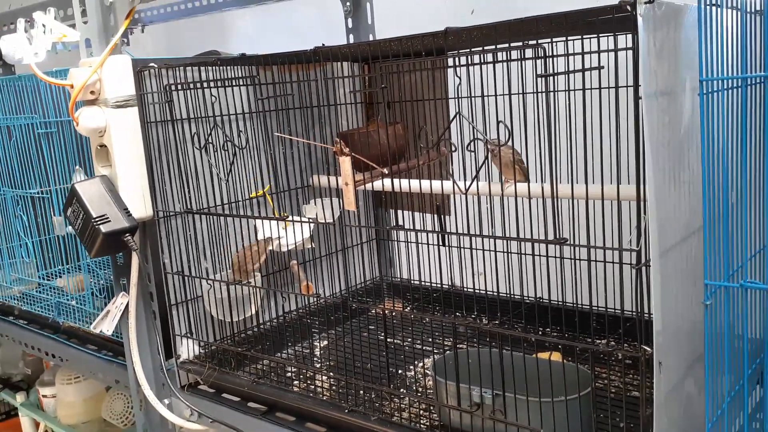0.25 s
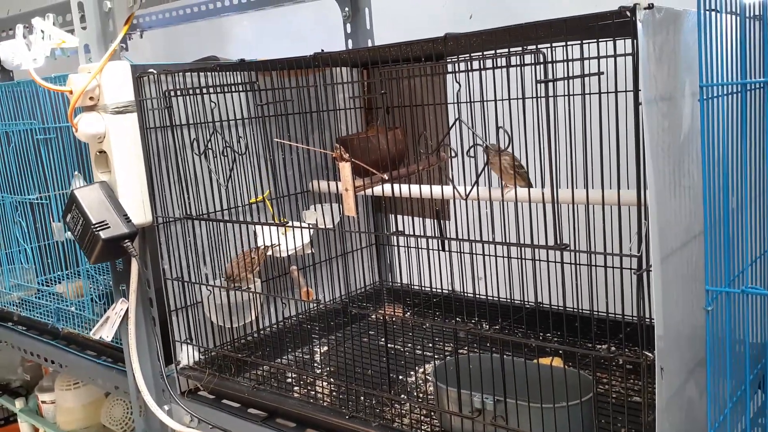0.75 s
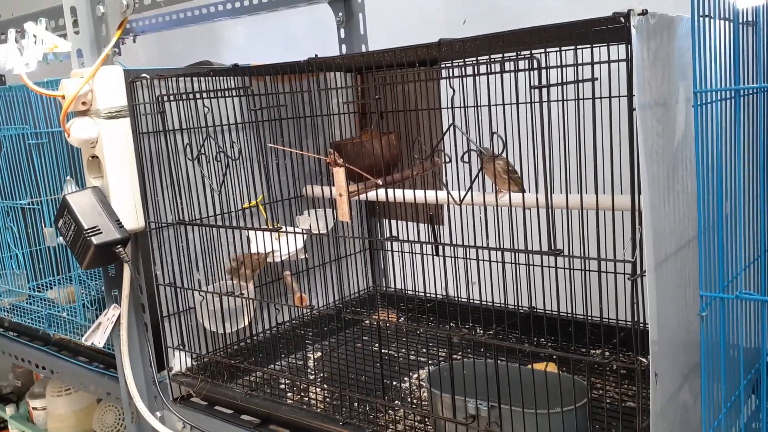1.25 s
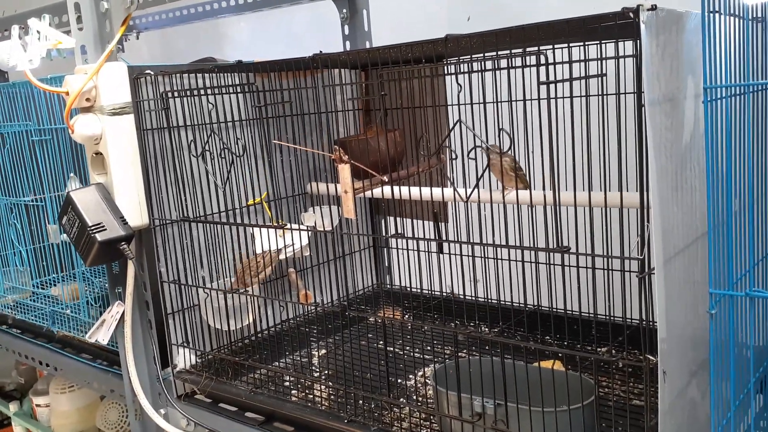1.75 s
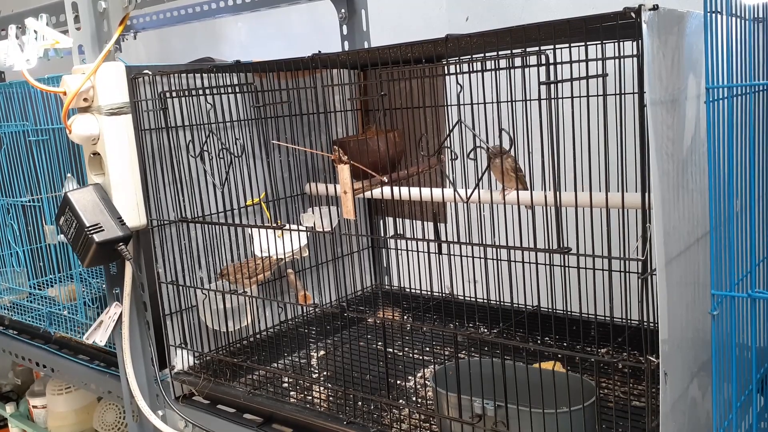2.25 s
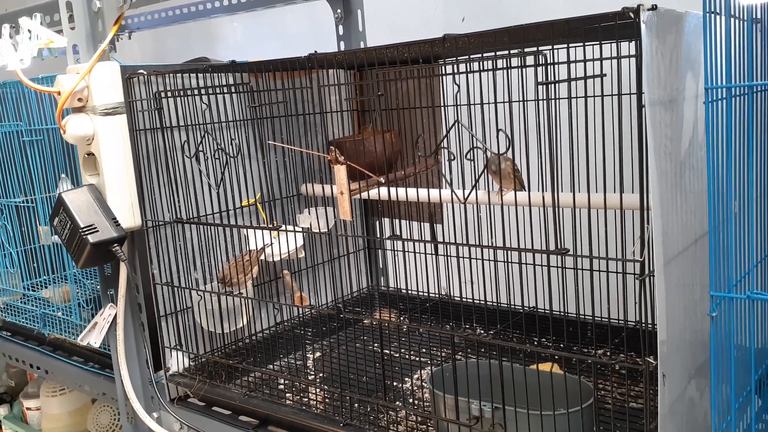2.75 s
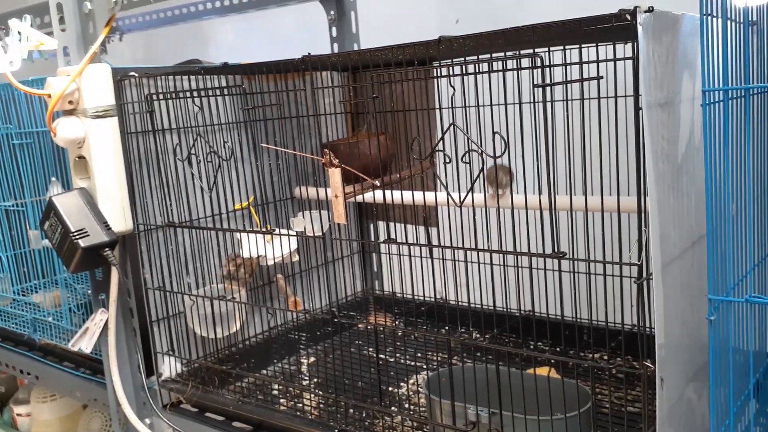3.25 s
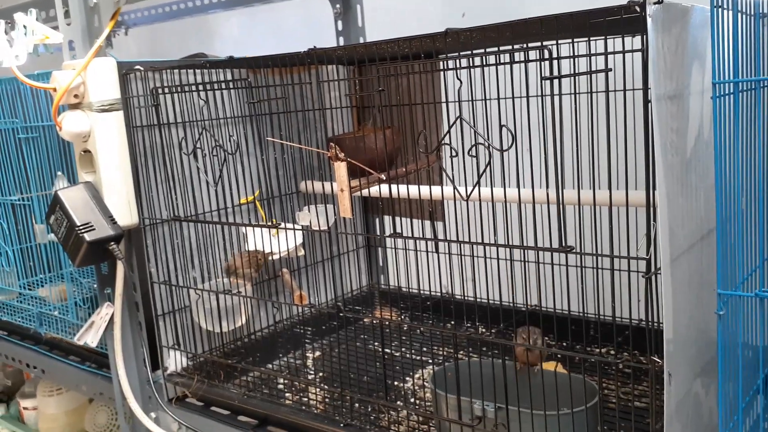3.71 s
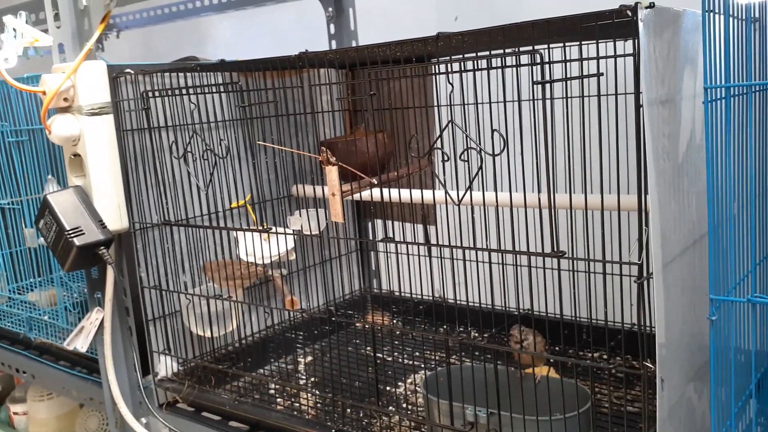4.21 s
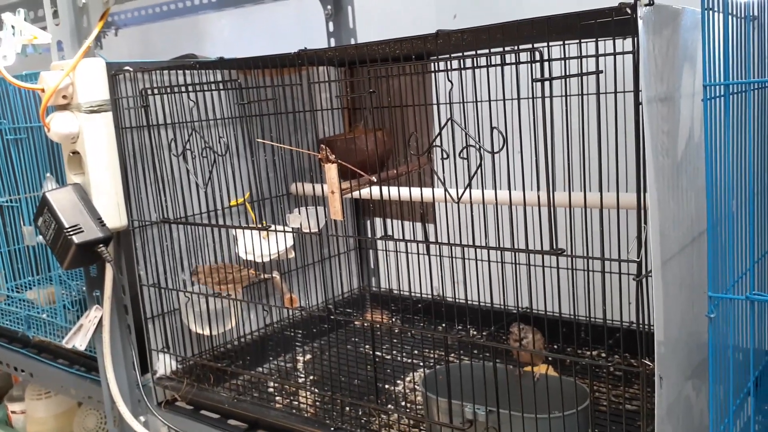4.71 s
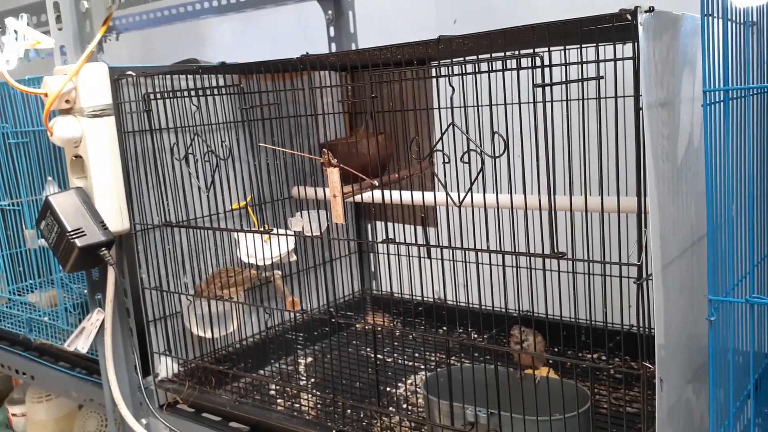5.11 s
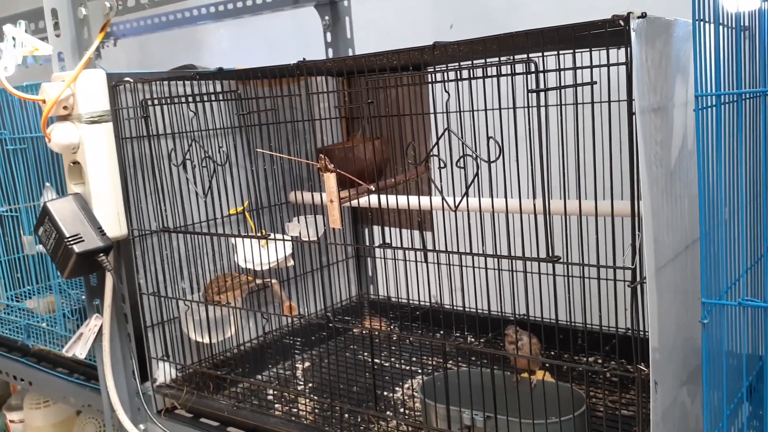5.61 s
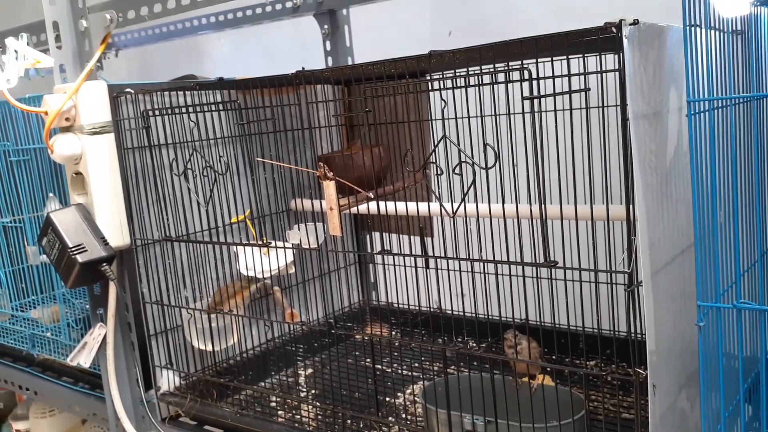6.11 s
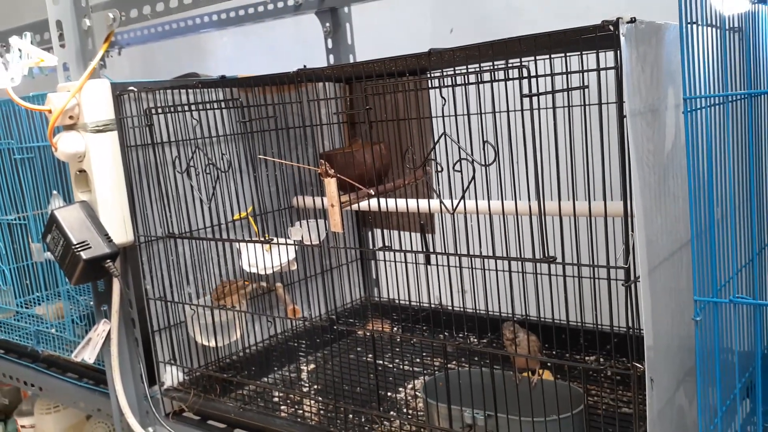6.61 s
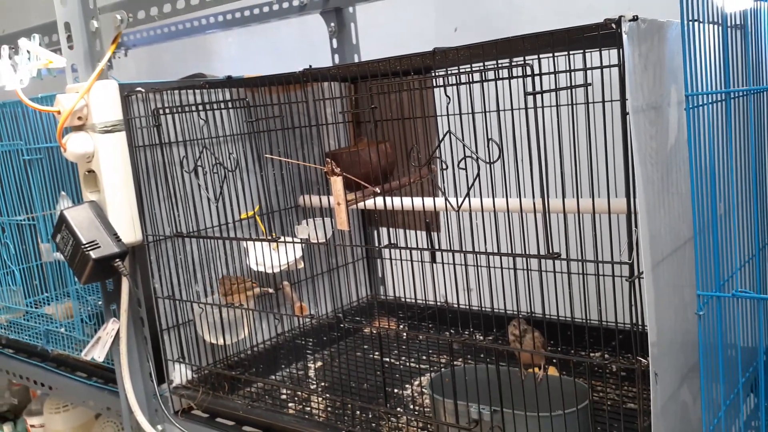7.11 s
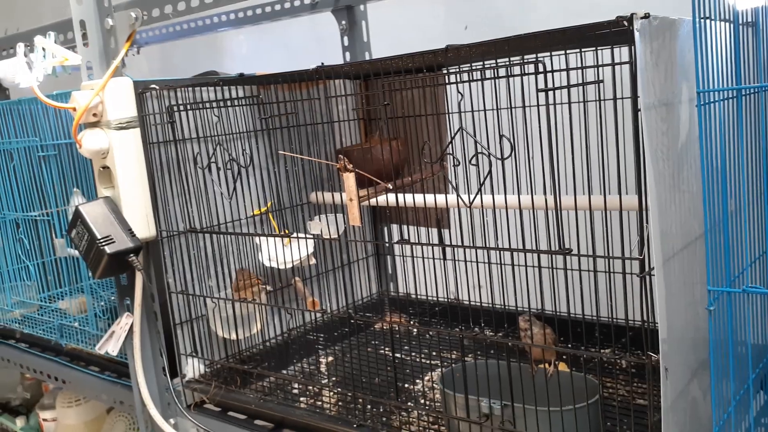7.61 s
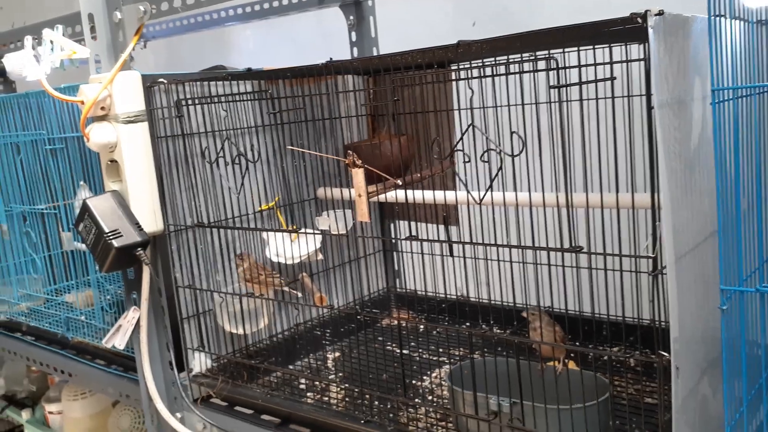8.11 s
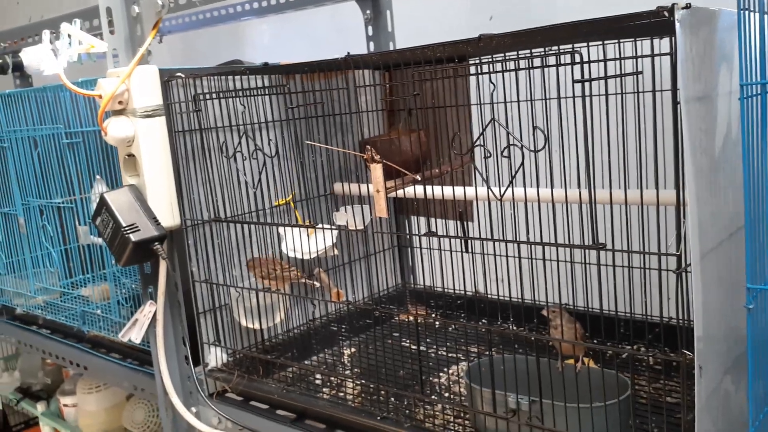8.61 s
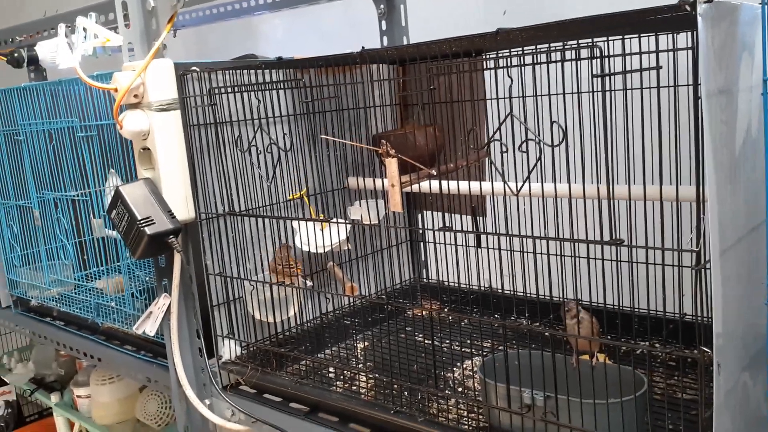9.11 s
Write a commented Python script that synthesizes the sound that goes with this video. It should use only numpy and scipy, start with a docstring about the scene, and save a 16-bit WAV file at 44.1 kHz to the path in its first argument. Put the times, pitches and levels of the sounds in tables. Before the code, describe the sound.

Caged finches sound off indoors, a few near the microphone and more in the distance. Brief high whistles stand out at first, then the calls thin to a faint rapid trill, with soft scrapes and claw taps on the cage wire. The twittering picks up again, ending with a loud falling cheep and a clear whistle. The room rings slightly, over a quiet wavering hum and thin hiss.

```python
"""A hard-walled room full of wire cages, with small finches calling.
Near birds give held whistles and falling cheeps, near-pure syrinx tones coloured by throat and beak.
One bird trills on and on; others twitter further off. Claws tick on the wire as birds land,
soft scrapes excite hollow rings, and a low hum wavers under the building's rumble and a thin hiss."""
import sys
import numpy as np
from scipy import signal
from scipy.fft import rfft, irfft, next_fast_len
from scipy.io import wavfile
from scipy.ndimage import map_coordinates

SR = 44100
rng = np.random.default_rng(int(sys.argv[2]) if len(sys.argv) > 2 else 0)


def generate_wav(sig):
    """Save sig (samples, or channels by samples) to the path in sys.argv[1] as 16-bit PCM at SR."""
    pcm = np.round(np.clip(np.atleast_2d(sig).T, -1, 1) * 32767).astype(np.int16)
    wavfile.write(sys.argv[1], SR, pcm)


N = 412335
T = np.arange(N) / SR

# held whistles: (time [s], length [s], start pitch [Hz], held pitch [Hz], slide [s], level [dB],
# overtone gain [dB], roughness [0-1])
WHISTLES = [ (0.468, 0.14, 4220, 4691, 0.029, -22, -20, 0.18),
            (0.77, 0.17, 3690, 3471, 0.07, -31.5, -28.5, 0.06),
            (2.346, 0.11, 2704, 3597, 0.03, -26.5, -24.5, 0.58),
            (3.222, 0.063, 3670, 3570, 0.021, -52, -29, 0.16),
            (3.348, 0.12, 3780, 3560, 0.016, -51.5, -27, 0.15),
            (3.651, 0.1354, 3570, 3455, .05, -26, -25.5, 0.07),
            (7.08, 0.145, 2680, 3648, 0.027, -35.5, -20, 0.9),
            (8.588, 0.13, 3693, 3486, 0.075, -24, -28.5, 0.11)]

def whistles(slide_db=15, sag_hz=1000, settle_s=0.04):
    """Each whistle slides softly onto its pitch and holds; rough ones slip below it until they settle."""
    out = np.zeros(N)
    for at_s, length_s, start_hz, held_hz, slide_s, db, overtones_db, rough in WHISTLES:
        t = np.arange(0, length_s, 1 / SR)
        sliding = np.maximum(1 - t / slide_s, 0)
        tremble = .005 * wander(t, 90)
        slips_hz = rough * sag_hz * np.tanh(wander(t, 260) ** 2 / 2) * np.exp(-t / settle_s)
        hz = held_hz * (1 + tremble) + (start_hz - held_hz) * sliding - slips_hz * (1 - sliding)
        onset_dip_db = slide_db * (1 - rough / 2) * np.sqrt(sliding)
        level = amp(db - onset_dip_db + 2.5 * rough * wander(t, 220))
        shape = swell(t, length_s, rise_s=.006, fall_s=.025)
        add(out, at_s, level * shape * syrinx(hz, overtones_db, drop_db=12.5))
    return out


# falling cheeps: (time [s], length [s], first pitch [Hz], middle pitch [Hz], last pitch [Hz],
# level [dB], overtone gain [dB])
CHEEPS = [ (0.34, 0.066, 4350, 3115, 2387, -37, -20), (1.336, 0.083, 4610, 3684, 2890, -51.5, -18),
          (2.165, 0.078, 3420, 2815, 2543, -36.5, -31.5), (2.192, 0.039, 5710, 5010, 3900, -45, -18),
          (2.75, 0.094, 4870, 3273, 2913, -42, -12), (5.661, 0.12, 4766, 3227, 2490, -38, -16.5),
          (7.557, 0.08, 3755, 3007, 2680, -37.5, -19), (8.097, 0.092, 4705, 3840, 3487, -18.5, -28.5),
          (8.208, 0.048, 3525, 2900, 2130, -32.5, -24)]

def cheeps(rise_s=0.015, fall_s=0.011, growth_db=1.5, flutter_db=4.3):
    """Each cheep drops fast, then levels out, growing louder and hoarser as it falls."""
    out = np.zeros(N)
    for at_s, length_s, first_hz, middle_hz, last_hz, db, overtones_db in CHEEPS:
        t = np.arange(0, length_s, 1 / SR)
        progress = t / length_s
        span_hz = first_hz - last_hz
        bend = -np.log2(np.clip((middle_hz - last_hz) / span_hz, .05, .9))  # middle pitch at half length
        strain = np.interp(db, [-36, -18], [1, .45])  # loud calls are purer
        hoarseness = strain * (.004 + .011 * progress) * wander(t, 900)
        hz = (last_hz + span_hz * (1 - progress) ** bend) * (1 + hoarseness)
        level = amp(db + growth_db * (progress - 1) + flutter_db * wander(t, 489))
        shape = swell(t, length_s, rise_s, fall_s)
        add(out, at_s, level * shape * syrinx(hz, overtones_db, harmonics=5))
    return out


# throat and beak response on the overtones: (frequency [Hz], gain [dB])
THROAT_RESPONSE = [(4500, 23), (5400, 9.5), (6400, -4.5), (7200, -17), (8200, 6), (9500, 1), (11000, 3.5),
                   (12500, 3), (14200, 2.5), (15500, -10.5)]

def syrinx(hz, overtones_db, harmonics=4, drop_db=8):
    """Near-pure tone; throat and beak shape the overtones, with an extra drop above the third harmonic."""
    phase = 2 * np.pi * np.cumsum(hz) / SR
    overtones = np.zeros_like(phase)
    for k in range(2, harmonics + 1):
        gain = amp(read(THROAT_RESPONSE, k * hz) - drop_db * (k > 3))
        overtones += gain * (k * hz < SR / 2) * np.sin(k * phase)
    return np.sqrt(2) * (np.sin(phase) + amp(overtones_db) * overtones)


# surges of the trill: (time [s], length [s], level [dB])
TRILL_SURGES = [(1.5, 0.82, -49.5), (3.7, 0.46, -52), (5.72, .72, -52.5), (7.75, 0.6, -50)]

def trill(rest_db=-60, rest_hz=5304, steady_from_s=3.75, syllables_per_s=16.6,
          push_hz_per_db=19.5, widen_hz_per_db=13):
    """Run of tiny, uneven falling syllables; pushing harder raises the pitch and widens each sweep."""
    surges = bouts(TRILL_SURGES, rise_s=.3, fall_s=.13)
    level = np.maximum(amp(rest_db) * (T > steady_from_s), surges)
    effort_db = 20 * np.log10(np.maximum(level / amp(rest_db), 1))
    rate_hz = syllables_per_s * (1 + .08 * wander(T, 12))
    cycle = (np.cumsum(rate_hz) / SR) % 1
    depth_hz = 115 + widen_hz_per_db * effort_db
    sweep_hz = depth_hz * (np.cos(np.pi * cycle) - 0.43 + 0.37 * wander(T, 700))
    gate = ramp(cycle / .2) * ramp((.85 - cycle) / .3)
    syllables = unit(gate * amp(2 * wander(T, 20)))
    pitch_hz = rest_hz + push_hz_per_db * effort_db + 30 * wander(T, 15)
    return level * syllables * syrinx(pitch_hz + sweep_hz, overtones_db=-19.5, harmonics=2)


# clearer calls from far cages: (time [s], length [s], first pitch [Hz], last pitch [Hz], level [dB])
FAR_CALLS = [ (-.06, 0.073, 6470, 4800, -40), (0.103, 0.062, 2874, 2744, -60.5),
             (0.163, 0.14, 4910, 3720, -50), (0.646, .04, 2814, 3430, -42),
             (0.635, 0.17, 6000, 5030, -50.5), (0.828, 0.11, 3260, 2920, -55.5),
             (1.011, 0.18, 2350, 2177, -69), (1.908, 0.045, 2057, 2680, -51),
             (2.39, 0.13, 5475, 5170, -47.5), (2.833, 0.14, 2800, 1880, -51.5),
             (2.929, 0.047, 4154, 3490, -44.5), (3.208, 0.22, 4234, 4120, -59.5),
             (3.498, 0.044, 2525, 2980, -50.5), (5.478, 0.23, 4340, 7000, -55),
             (5.862, 0.15, 6780, 6920, -54), (5.938, 0.27, 4110, 3160, -56),
             (6.152, 0.094, 3310, 3380, -47.5), (6.187, 0.094, 3100, 1944, -52.5),
             (6.268, 0.12, 5000, 4520, -48.5), (6.352, 0.18, 7550, 5170, -53.5),
             (6.48, 0.11, 5200, 4630, -46), (6.605, .1, 3626, 3262, -52), (6.753, 0.17, 5970, 4806, -50),
             (6.855, 0.19, 2113, 2754, -62), (7.174, 0.17, 5475, 4250, -46), (7.365, 0.12, 3094, 3820, -48),
             (7.442, 0.17, 7240, 6600, -55), (7.661, .07, 4590, 3680, -43), (8.329, 0.09, 5440, 4750, -44),
             (8.451, 0.043, 2590, 2270, -42.5), (8.631, 0.14, 4990, 4430, -45.5),
             (8.736, .13, 2666, 2480, -59), (8.812, .085, 7460, 6560, -56.5),
             (8.965, 0.44, 3770, 3410, -54.5), (9.019, 0.11, 3185, 2162, -52),
             (9.217, 0.063, 6480, 5620, -51.5)]

def twitter(min_rasp=0.092, rasp_per_octave=1.9, max_rasp=.55):
    """Single far calls; the steeper the glide, the more it buzzes."""
    out = np.zeros(N)
    for at_s, length_s, first_hz, last_hz, db in FAR_CALLS:
        octaves = abs(np.log2(first_hz / last_hz))
        rasp = min(min_rasp + rasp_per_octave * octaves, max_rasp)
        add(out, at_s, amp(db) * slur(length_s, first_hz, last_hz, rasp))
    return out


# bouts of flock chatter: (time [s], length [s], level [dB])
FLOCK_BOUTS = [(-.1, 1.1, -59), (5.7, 1.19, -58), (7.4, 2.2, -58.5)]

def flock(count=480, low_hz=3766, high_hz=7010, treble_db=-4):
    """Faint falling slurs at random times blend into chatter; higher ones are softer."""
    chatter = np.zeros(N)
    for when, stretch, height, drop in rng.random((count, 4)):
        hz = low_hz + (high_hz - low_hz) * height
        call = slur(0.06 + 0.053 * stretch, hz, hz * (1 - 0.33 * drop), rasp=0.35)
        add(chatter, when * N / SR, amp(treble_db * height) * call)
    return unit(chatter) * bouts(FLOCK_BOUTS, rise_s=0.1, fall_s=0.051)


def slur(length_s, first_hz, last_hz, rasp):
    """Short glide; a fast pitch shake makes it buzz."""
    t = np.arange(0, length_s, 1 / SR)
    glide_hz = first_hz + (last_hz - first_hz) * t / length_s
    shake = 0.1155 * rasp * wander(t, 700)
    shape = swell(t, length_s, .3 * length_s, .2 * length_s)
    return shape * syrinx(glide_hz * (1 + shake), overtones_db=-28, harmonics=2)


# landings on the wire, and a louder rustle near 7.8 s: (time [s], level [dB])
WIRE_TICKS = [(0.33, -44.5), (1.912, -57.5), (1.971, -51.5), (2.048, -52), (2.915, -46), (3.537, -49.5),
              (5.219, -63), (6.03, -42), (6.11, -47.5), (6.938, -53), (7.788, -38)]
# claw tick spectrum: (frequency [Hz], gain [dB])
CLAW_SPECTRUM = [(200, -20), (900, -26.5), (1600, -29), (3000, 0), (5000, -7.5), (8000, -4), (11000, -7),
                 (15000, -21)]

def claw_taps(t60_s=0.1, steps=3, step_s=.02, step_db=-13.5):
    """Claws tick on the cage wire: a landing or a rustle, then shuffling steps, each softer."""
    envelope = np.zeros(N)
    t = np.arange(SR // 10) / SR
    decay = np.exp(-np.log(1000) * t / t60_s)
    for at_s, db in WIRE_TICKS:
        for step, spacing in enumerate(rng.uniform(.8, 1.2, steps)):
            add(envelope, at_s + step * spacing * step_s, amp(db + step * step_db) * decay)
    return envelope * noise(CLAW_SPECTRUM)


# scrapes and soft bumps: (time [s], length [s], friction level [dB], ring pitch [Hz], ring level [dB])
SCRAPES = [(2.822, 0.17, -59.5, 115, -62), (3.536, 0.024, -38, 787, -47.5), (3.802, 0.14, -52, 750, -60.5),
           (4.032, 0.12, -56, 740, -64), (4.229, 0.16, -55, 608, -55), (4.569, 0.14, -73.5, 521, -59),
           (4.68, 0.11, -55.5, 415, -59.5), (4.821, .13, -57.5, 262, -60.5), (7.531, 0.21, -57, 199, -70),
           (7.773, 0.21, -54, 276, -72), (8.115, 0.16, -60, 99.7, -59.5)]
# friction spectrum: (frequency [Hz], gain [dB])
FRICTION_SPECTRUM = [(150, -2.5), (450, -0.5), (900, 2.5), (1300, -6.5), (2200, 3), (3500, -1), (6000, -6),
                     (10000, -12.5), (15000, -25)]
# modes of the hollow ring: (frequency / ring pitch [ratio], gain [dB])
RING_MODES = [(0.999, 2), (2.35, -4.5), (4.699, -14.5)]

def scrapes(grain_db=3, ring_q=1 / 0.093):
    """Grainy friction noise and the hollow, constant-Q rings it excites."""
    strokes, rings = np.zeros(N), np.zeros(N)
    for at_s, length_s, friction_db, ring_hz, ring_db in SCRAPES:
        t = np.arange(0, length_s, 1 / SR)
        add(strokes, at_s, amp(friction_db) * swell(t, length_s, rise_s=0.0035, fall_s=0.074))
        ring_shape = swell(t, length_s, rise_s=0.0033, fall_s=0.033)
        for ratio, mode_db in RING_MODES:
            resonator = signal.iirpeak(ring_hz * ratio, ring_q, SR)
            ring = unit(signal.lfilter(*resonator, rng.standard_normal(len(t))))
            add(rings, at_s, amp(ring_db + mode_db) * ring * ring_shape)
    friction = unit(noise(FRICTION_SPECTRUM) * amp(grain_db * wander(T, 390)))
    return strokes * friction + rings


# swells of the hum: (time [s], length [s], level [dB])
HUM_SWELLS = [(-.05, .5, -55.5), (2.7, 0.74, -56.5), (3.53, .35, -56.5), (4.07, 0.6, -59.5),
              (4.68, 0.26, -54), (5.1, 0.86, -62), (6.1, 0.78, -66), (7.6, 0.516, -56), (8.4, .55, -62)]

def hum(pitch_hz=66, drift_hz=1.4, rest_db=-76.5, waver_db=3):
    """Low wavering tone that swells over its resting level."""
    resting = amp(rest_db + waver_db * wander(T, 15))
    level = np.maximum(resting, bouts(HUM_SWELLS, rise_s=0.2, fall_s=0.12))
    phase = 2 * np.pi * np.cumsum(pitch_hz + drift_hz * wander(T, 6.9)) / SR
    return level * np.sqrt(2) * np.sin(phase)


# building rumble: (time [s], level before trim [dB])
RUMBLE_LEVEL = [(0.0, -72), (0.05, -61.5), (2.34, -68.5), (2.86, -58.5), (4.19, -66.5), (4.84, -61.5),
                (5.75, -65), (8.25, -57), (9.35, -63.5)]
# rumble and hiss spectra: (frequency [Hz], gain [dB])
RUMBLE_SPECTRUM = [(20, -23.5), (40, -12), (60, 7.5), (85, -1.5), (150, 3.5), (250, -3.5), (400, -12),
                   (700, -30.5), (1500, -33), (4000, -29)]
HISS_SPECTRUM = [(100, -22.5), (600, 3), (1300, -3.5), (3000, -8.5), (7000, -8.5), (10000, -2.5),
                 (13000, -16), (15500, -26)]
# left-right coherence of both: (frequency [Hz], coherence [0-1])
COHERENCE = [(30, 0.9), (130, 0.86), (260, 0.89), (500, 0.3), (1000, 0.1), (4000, 0)]

def rumble_and_hiss(trim_db=1, hiss_db=-73):
    """Building rumble and thin hiss; the two channels are alike in the bass, independent in the treble."""
    level = amp(np.interp(T, *np.transpose(RUMBLE_LEVEL)) + trim_db)
    left, independent = (rfft(level * noise(RUMBLE_SPECTRUM) + amp(hiss_db) * noise(HISS_SPECTRUM))
                         for _ in range(2))
    coherence = np.clip(read(COHERENCE, np.fft.rfftfreq(N, 1 / SR)), 0, 1)
    right = coherence * left + np.sqrt(1 - coherence ** 2) * independent
    return irfft(np.array([left, right]), N)


# room decay: (frequency [Hz], T60 [s])
ROOM_T60 = [(300, .6), (1500, .7), (3500, .6), (5500, .62), (9000, .55), (14000, .45)]

def room(dry, tail_db, early_db=-8, first_s=0.0034, spread_s=0.026, reflections=8):
    """Direct sound, early reflections off cages and walls, then a diffuse tail; unit power gain."""
    hz, t, spectrum = signal.stft(rng.standard_normal((2, SR)), SR, nperseg=256)
    decay = np.exp(-np.log(1000) * t / read(ROOM_T60, hz)[:, None])
    tail = signal.istft(spectrum * decay, SR, nperseg=256)[1]
    tail *= np.minimum(np.arange(tail.shape[1]) / SR / 0.01, 1)  # 10 ms build-up
    response = amp(tail_db) * tail / np.linalg.norm(tail, axis=1, keepdims=True)
    for channel in response:
        delays = (SR * (first_s + spread_s * rng.random(reflections))).astype(int)
        channel[delays] += amp(early_db) * rng.choice([-1, 1], reflections) / np.sqrt(reflections)
    response[[0, 1], [0, 2]] += 1  # direct sound, left microphone first
    response /= np.linalg.norm(response, axis=1, keepdims=True)
    return signal.fftconvolve(dry[None], response, axes=1)[:, :N]


def amp(db):
    """Decibels to gain."""
    return 10 ** (np.asarray(db) / 20)


def unit(x):
    """Scales to rms 1."""
    return x / np.sqrt(np.mean(x ** 2) + 1e-20)


def read(points, hz):
    """Interpolates a table on a log-frequency axis."""
    table_hz, values = np.transpose(points)
    return np.interp(np.log(hz + 1), np.log(table_hz), values)


def add(mix, at_s, sound):
    """Mixes a sound in, cropped to the mix."""
    start = round(at_s * SR)
    sound = sound[max(-start, 0):]
    part = mix[max(start, 0):][:len(sound)]
    part += sound[:len(part)]


def noise(spectrum):
    """Steady shaped noise, rms 1."""
    size = next_fast_len(N)
    gain = amp(read(spectrum, np.fft.rfftfreq(size, 1 / SR)))
    return unit(irfft(rfft(rng.standard_normal(size)) * gain, size)[:N])


def wander(t, rate_hz):
    """Smooth random motion, rms about 1."""
    return map_coordinates(rng.standard_normal(4096), [t * rate_hz], order=3, mode="grid-wrap")


def ramp(x):
    """Sine-squared step from 0 to 1."""
    return np.sin(np.pi / 2 * np.clip(x, 0, 1)) ** 2


def swell(t, length_s, rise_s, fall_s):
    """Rounded rise and fall."""
    return ramp(t / rise_s) * ramp((length_s - t) / fall_s)


def bouts(rows, rise_s, fall_s):
    """Gain over time, one swell per row."""
    return sum(amp(db) * swell(T - at_s, length_s, rise_s, fall_s) for at_s, length_s, db in rows)


def scene():
    """Near birds, far birds and cage noises in one room, over the background."""
    near = room(whistles(), tail_db=-1, early_db=-4) + room(cheeps(), tail_db=6, early_db=-8.5)
    far = room(twitter() + flock(), tail_db=6) + room(trill(), tail_db=3)
    cages = room(scrapes(), tail_db=2.5) + room(claw_taps(), tail_db=1.5)
    return near + far + cages + hum() + rumble_and_hiss()


# microphone imbalance: (frequency [Hz], left minus right [dB])
MIC_BALANCE = [(60, 0), (130, 2.5), (1000, 1), (3000, 1.3), (5500, 3.5), (7500, 5.5), (10000, 3.5),
               (14000, 1)]

def record(dry, cutoff_hz=15720):
    """Two microphones, the left more sensitive, then a low-pass."""
    tilt_db = read(MIC_BALANCE, np.fft.rfftfreq(N, 1 / SR)) / 2
    heard = irfft(rfft(dry) * amp([tilt_db, -tilt_db]), N)
    lowpass = signal.firwin(511, cutoff_hz, window=("kaiser", 9), fs=SR)
    return signal.oaconvolve(heard, lowpass[None], "same")


dry = scene()
out = record(dry)
generate_wav(out)
```